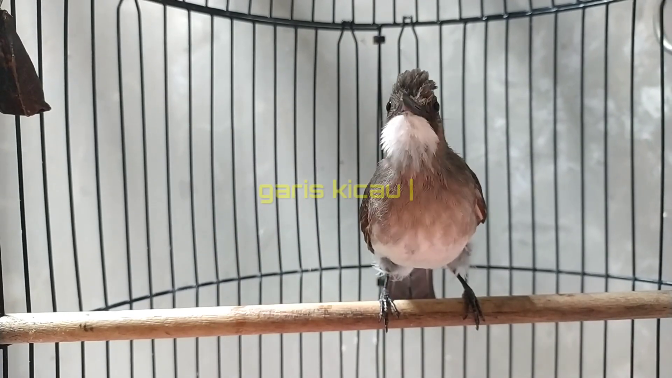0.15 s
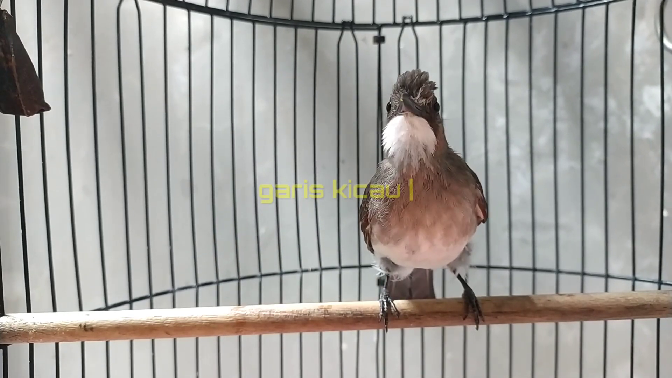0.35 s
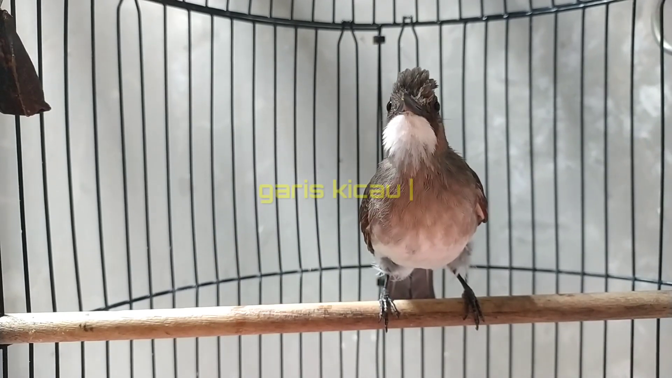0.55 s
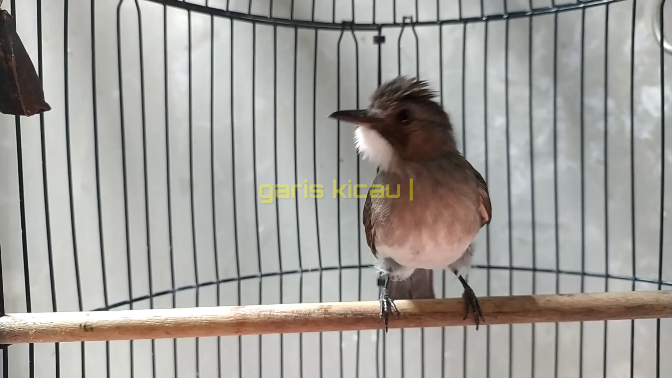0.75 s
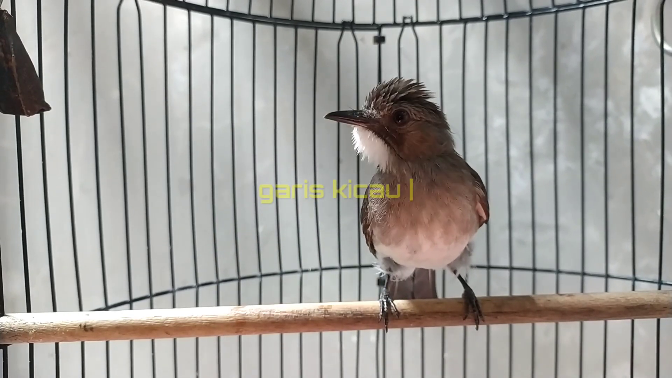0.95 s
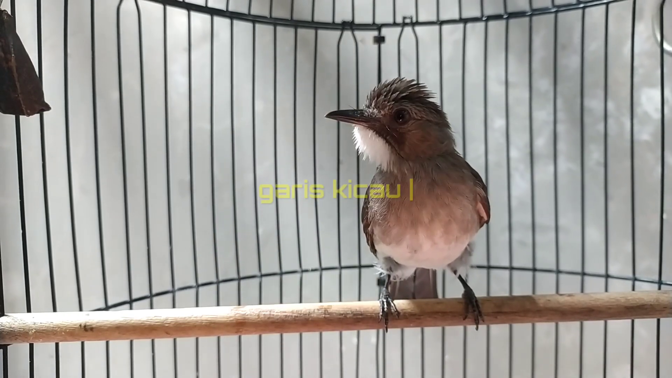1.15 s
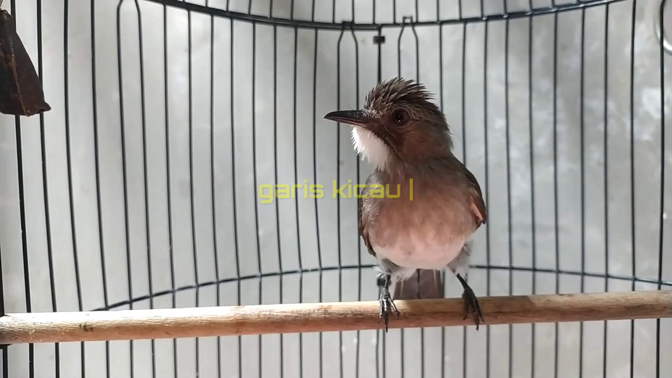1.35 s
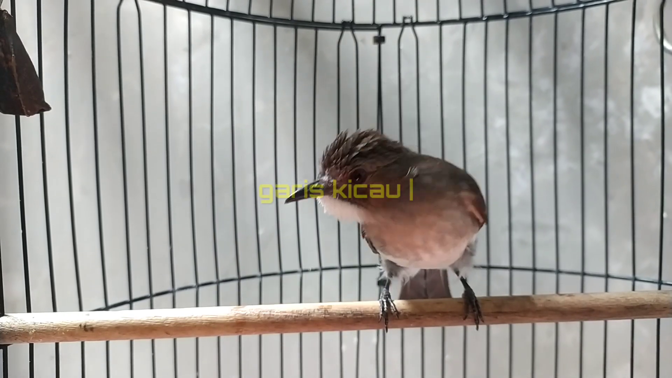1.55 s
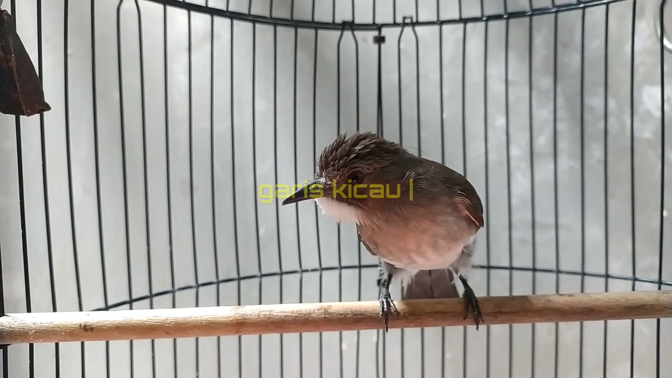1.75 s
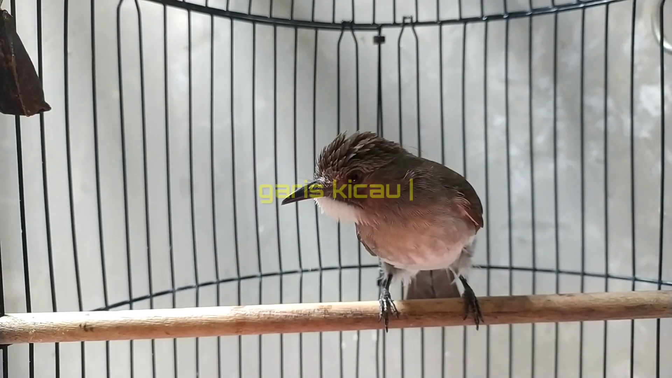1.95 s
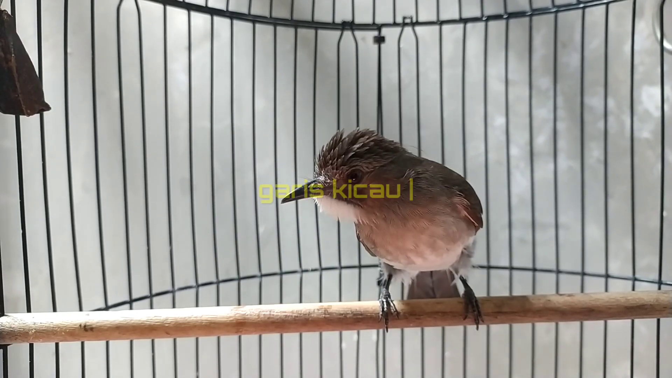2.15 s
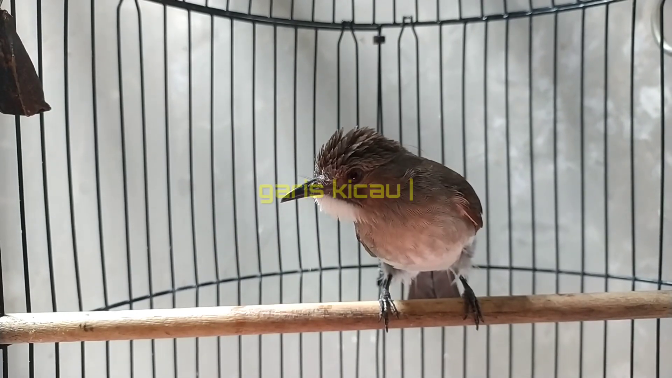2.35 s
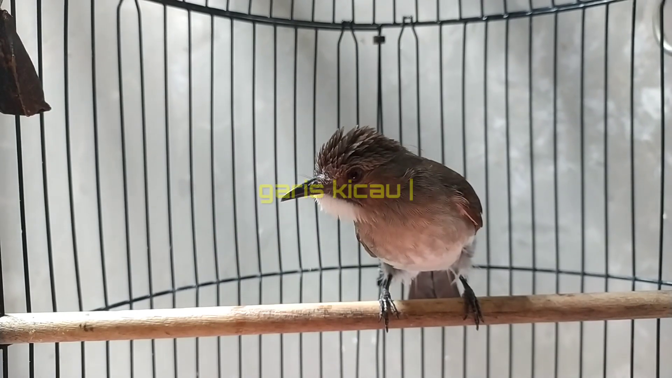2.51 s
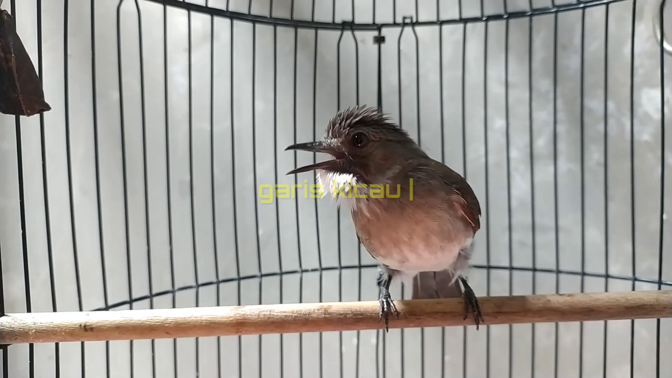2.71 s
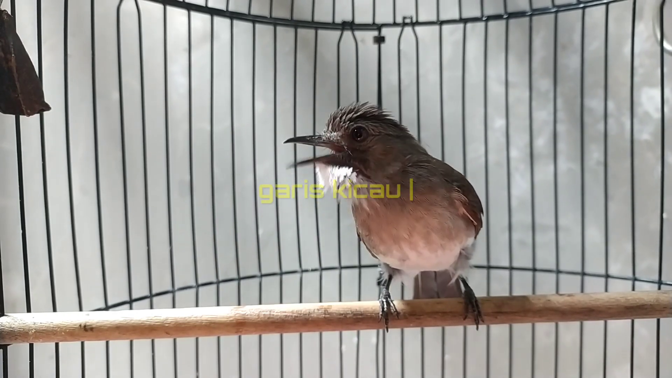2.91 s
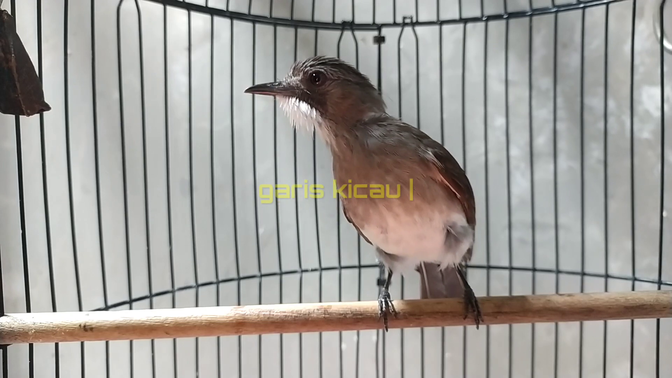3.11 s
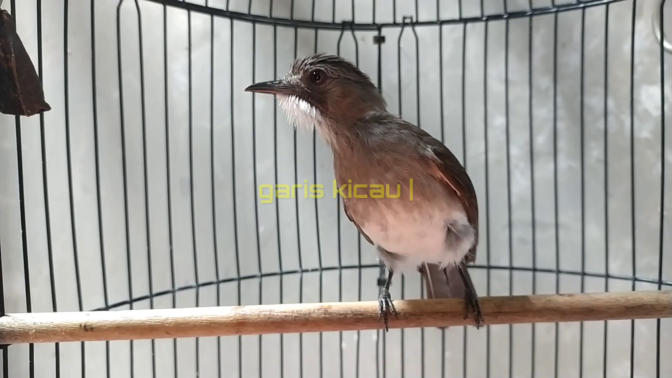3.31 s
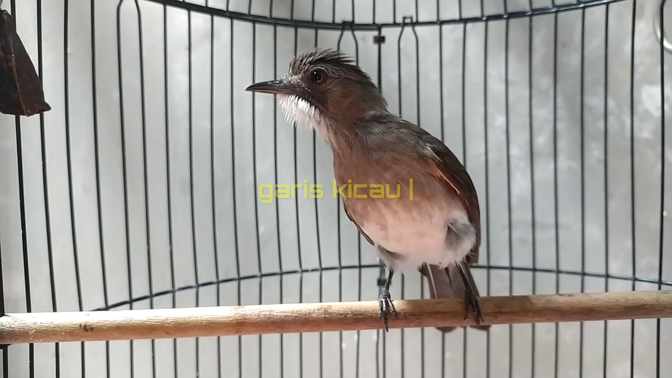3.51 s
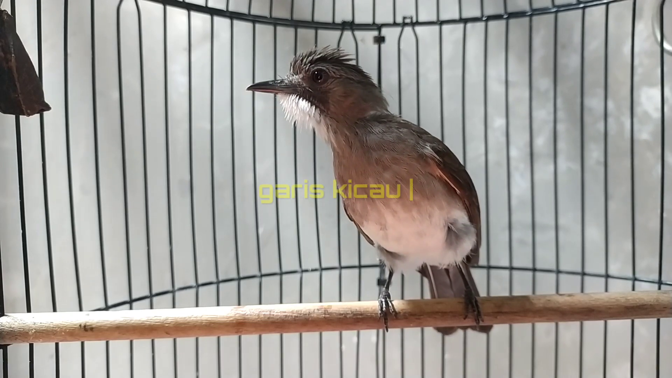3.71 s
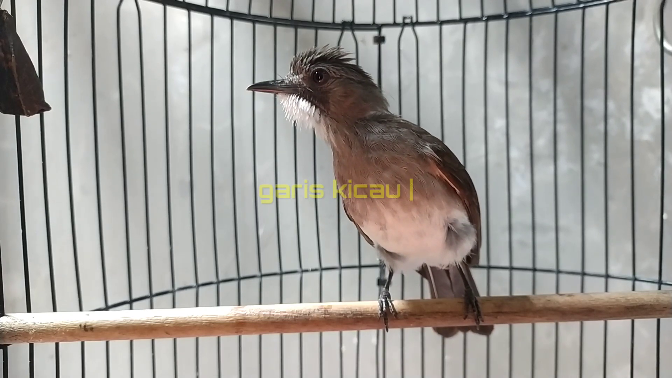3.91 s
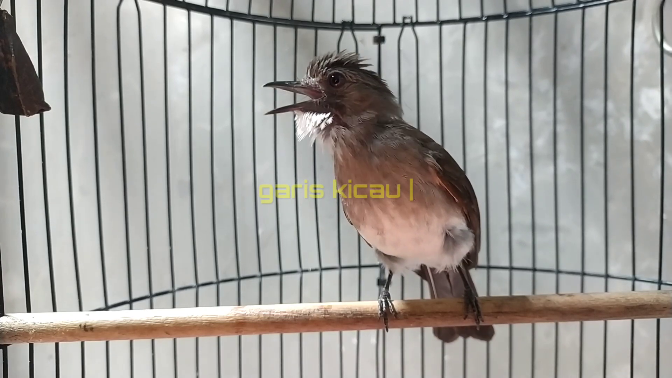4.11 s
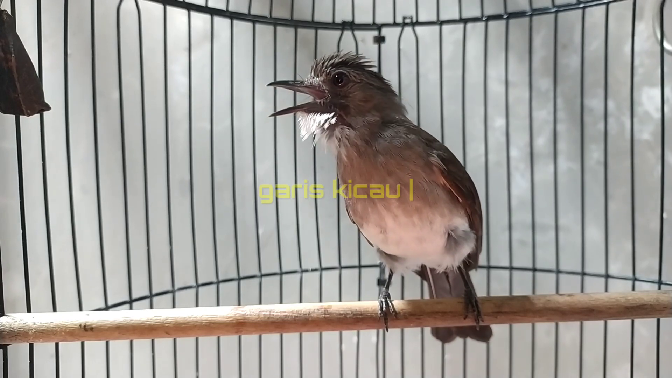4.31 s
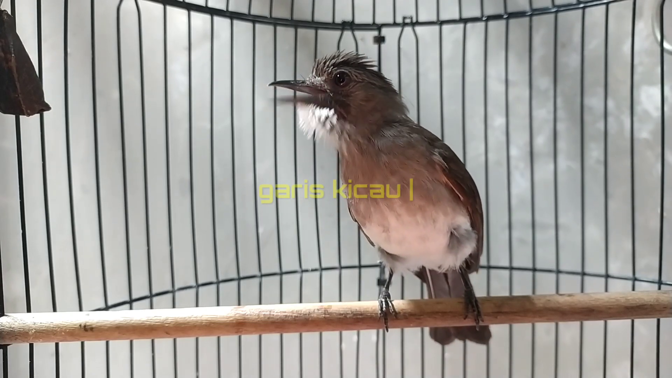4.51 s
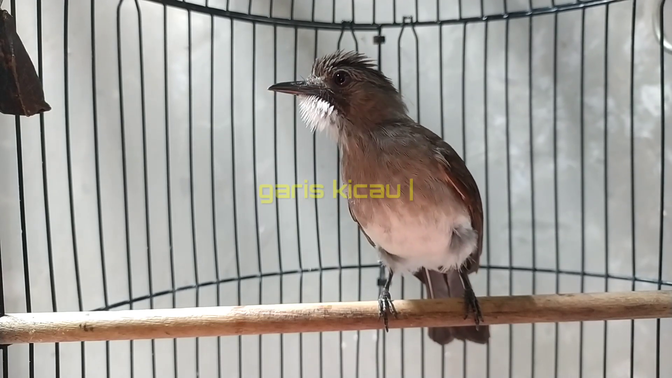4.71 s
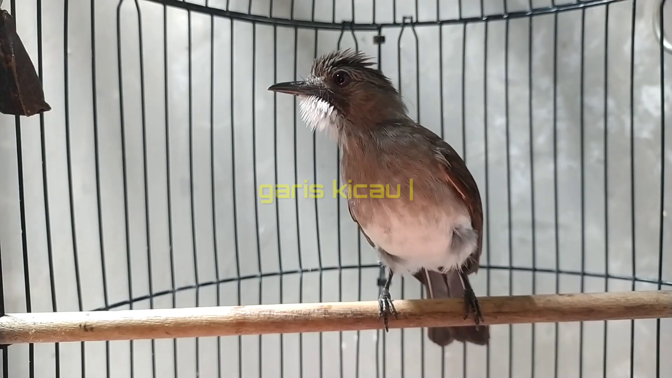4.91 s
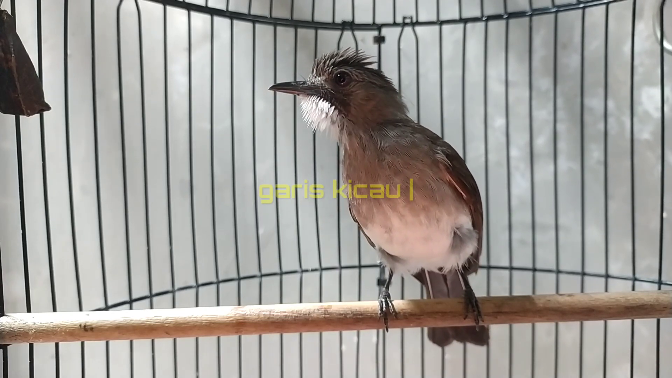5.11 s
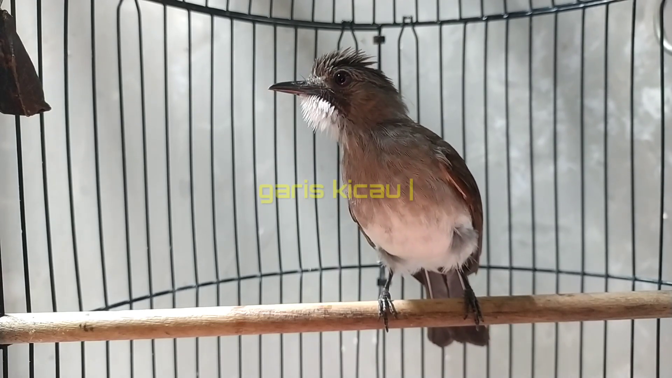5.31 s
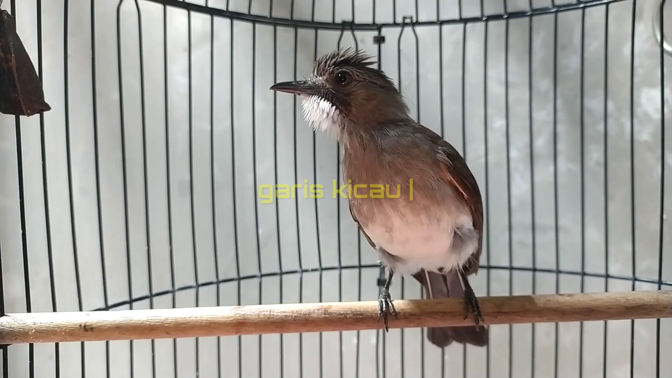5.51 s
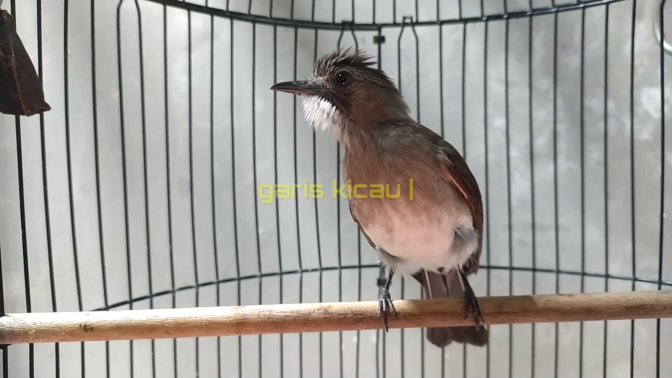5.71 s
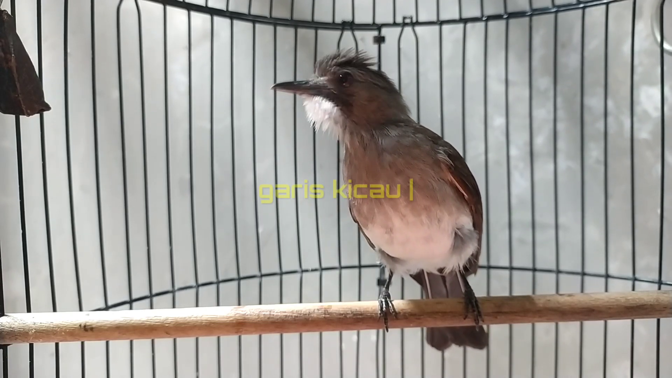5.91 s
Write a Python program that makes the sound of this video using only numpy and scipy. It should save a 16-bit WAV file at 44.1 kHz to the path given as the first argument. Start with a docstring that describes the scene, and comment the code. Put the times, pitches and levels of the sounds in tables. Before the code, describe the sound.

In a hard, bare room, a caged bird close to a stereo microphone opens with a short bright whistle. A small bird across the room twitters rapidly in high rising slurs and chips, mostly echo. After a quiet gap the close bird gives a loud, harsh buzzing call, then a longer, softer one. Another similar bird answers dully from far off. Soft hiss and rumble lie underneath.

```python
"""First one clear whistle, then two buzzing calls: a caged bulbul close to a stereo microphone in a hard, bare room.
A smaller bird twitters across the room and another bulbul answers from far off, both mostly as echo.
A quiet hiss and rumble lies under it all, and a faint low hum swells once.
Birds and hum are harmonics of a gliding pitch, weighted by a throat; the room is decaying noise, the air shaped noise.
"""
import sys
import numpy as np
from scipy import signal
from scipy.fft import rfft, irfft, next_fast_len
from scipy.io import wavfile
from scipy.ndimage import uniform_filter1d

SR = 44100
rng = np.random.default_rng(int(sys.argv[2]) if len(sys.argv) > 2 else 0)


def int16_out(signal):
    """Quantize to a 16-bit WAV file."""
    q = np.round(np.clip(np.atleast_2d(signal).T, -1, 1) * 32767)
    wavfile.write(sys.argv[1], SR, q.astype(np.int16))


N = 262395

# Room air, spectral shape before its level is set: f/Hz, relative density/dB per Hz
AIR_SPECTRUM = [(12, -33.5), (20, 1.5), (76, -8), (289, -12.5), (333, -9.5), (382, -12.5), (427, -15),
                (1160, -14.5), (1270, -13.5), (1870, -16.5), (3640, -20.5), (3960, -21), (4810, -35),
                (9660, -25), (15500, -57)]
# Room air, level of the two ports averaged: t/s, level/dB
AIR_LEVEL = [(0, -57.5), (2.001, -58.5), (4.001, -60), (5.95, -60)]
# Room air, likeness of left and right: f/Hz, correlation/0-1
AIR_LIKENESS = [(30, 0.17), (150, 0.5), (600, .6), (1500, 0), (3000, 0)]
# Echoes by band: top of band f/Hz, t60/s, relative level/dB
ROOM_BANDS = [(1300, 0.23, 10.5), (2130, 0.43, 3), (3600, 0.63, -1.5), (6060, 0.58, 1.5), (10500, 0.4, 2),
              (15980, 0.49, -0.5)]

# Close bird, held part of the whistle before the throat: t/s, pitch f/Hz, level/dB
WHISTLE_HELD = [(.063, 1004, -19), (.079, 1046, -21.5), (.11, 1050, -23.5), (.16, 1021, -18),
                (.183, 1003, -21.5), (.197, 932, -24)]
# Throat and beak in the whistle: f/Hz, gain/dB
WHISTLE_THROAT = [(900, -30.5), (2000, -11.5), (3100, 4), (3700, -8.5), (4150, -14.5), (5200, -22),
                  (6300, -33), (7300, -25.5), (8300, -17), (9400, -27.5), (10400, -26.5), (11400, -45),
                  (12500, -32), (15000, -54)]

# Small bird across the room, rising slurs:
# start t/s, length/s, from f/Hz, to f/Hz, opening level/dB, swell/dB
TWITTER_SLURS = [(0.496, 0.039, 4300, 4814, -46.5, 4), (0.682, .09, 4467, 5440, -36.5, -5.5),
                 (0.908, 0.092, 4427, 5567, -37, -3.5), (1.134, 0.095, 4430, 5704, -36.5, 1),
                 (1.376, 0.09, 4456, 5677, -35, 0), (1.61, 0.1, 4300, 5652, -37.5, 1)]
# Its chips between the slurs:
# start t/s, low f/Hz, wait on the low note/s, peak f/Hz, low-note level/dB, peak level/dB
TWITTER_CHIPS = [(.595, 3840, 0.018, 4495, -55, -48.5), (.818, 3740, .004, 4910, -47, -36),
                 (1.038, 3920, 0.024, 5030, -44.5, -34), (1.28, 3860, .024, 4994, -47, -34.5),
                 (1.52, 3818, 0.022, 5084, -46, -33.5)]
# Its throat: f/Hz, gain/dB
TWITTER_THROAT = [(3500, 5.5), (6000, 1.5), (7800, -10.5), (9600, 0), (11500, -10), (14000, -30.5),
                  (16000, -19)]

# Far bird's answers: start t/s, length/s, top pitch f/Hz, top level/dB, lift of the lower partials/dB
FAR_ANSWERS = [(0.942, 0.304, 900, -52.5, 2), (1.402, 0.095, 860, -46, 7), (1.657, 0.15, 915, -43.5, -2.5),
               (2.132, 0.27, 917, -51.5, -0.5), (3.378, 0.27, 903.5, -56.5, 7),
               (4.868, 0.133, 939, -52, -1), (5.088, 0.27, 930, -50.5, -5.5), (5.463, 0.2, 941, -50, 0.5)]
# Its throat: f/Hz, gain/dB
ANSWER_THROAT = [(900, -55), (1850, -21), (2750, -12), (3650, 4.5), (4300, -74)]

# Low hum that swells once: t/s, f/Hz, level/dB
HUM_PATH = [(2.5, 97.8, -81), (3.1, 100.8, -70.5), (3.5, 99.55, -68), (4.0, 101.6, -71.5), (4.8, 101, -89)]

# Close bird, held part of each buzzing call before the throat: t/s, pitch f/Hz, level/dB
BUZZ_CALLS = [
    [(2.785, 878.4, -8), (2.855, 870.6, -6.5), (2.935, 842.8, -7.5), (2.995, 838, -10.5), (3.026, 805, -11)],
    [(4.185, 907.5, -17), (4.27, 917, -15), (4.36, 886.4, -16.5), (4.415, 876.6, -16), (4.47, 872, -18.5),
     (4.575, 927.3, -15.5), (4.62, 925.6, -19.5)],
]
# Throat and beak, a little different in each buzzing call: f/Hz, gain/dB
BUZZ_THROATS = [
    [(900, -59), (1850, -28.5), (2200, -42), (2700, -24), (3400, -8), (4300, -29.5), (5400, -35),
     (6000, -52.5), (8100, -34.5), (9500, -40.5), (10500, -47.5), (12000, -64), (13500, -52), (15000, -71)],
    [(900, -50), (1900, -21), (2250, -27), (2750, -12.5), (3650, -2.5), (4100, -19), (4500, -26.5),
     (5400, -30), (6400, -34), (8100, -26.5), (9000, -36.5), (10000, -33), (12300, -39.5), (13500, -62)],
]
# Pitch swing of each buzzing call, shares of pitch: as it opens, as it closes
BUZZ_SWINGS = [(.085, .03), (.055, .035)]

# Each close call scoops up into its pitch and drops off it; shares are of pitch
SCOOP_S, SCOOP_SHARE, SCOOP_DB = .047, .14, -4
ATTACK_S, ATTACK_DB = .018, -22
DROP_S, DROP_SHARE, DROP_DB = .022, .2, -7

SLUR_BEND = 1.8  # exponent: a slur rises fast, then levels off
# A chip creeps up on its low note, jumps to its peak, then sags; creep and sag are shares of pitch
CHIP_CREEP, CHIP_JUMP_S = 0.0525, 0.01277
CHIP_FALL_S, CHIP_SAG, CHIP_FADE_DB = 0.0198, 0.0484, -9

BUZZ_HZ = 144  # mean rate of the buzz
BUZZ_DB, BUZZ_TURN = 3.5, 0.9  # loudness swing each way, and its lead on the pitch swing in radians
TOP_HZ = 15500  # the recorder's upper limit


def undb(db):
    """Gain of a level in dB."""
    return 10 ** (np.asarray(db) / 20)


def on_log(hz, table):
    """A (Hz, value) table read on a log-frequency axis."""
    f, v = np.transpose(table)
    return np.interp(np.log(np.maximum(hz, 1)), np.log(f), v)


def walk(rate, size):
    """Random levels held 1 / rate s and slewed twice; spread near 1."""
    hold = max(int(SR / rate), 2)
    steps = np.repeat(rng.standard_normal(size // hold + 1), hold)
    slewed = uniform_filter1d(uniform_filter1d(steps, hold), hold)
    return 1.3 * slewed[:size]


def add(track, rows, throat, count, buzz_db=0., buzz_turn=0., jitter=.002, edge_s=0.006,
        dull=0., croak=0., settle_s=.01, shimmer_db=0.):
    """Sings one note into track: harmonics of a gliding pitch, each weighted by the throat where it falls."""
    s, hz, db, *swing = np.transpose(rows)
    start, stop = int(s[0] * SR), int(s[-1] * SR)
    t = np.arange(start, stop) / SR
    smooth = int(0.00511 * SR)
    hz, db = (uniform_filter1d(np.interp(t, s, c), smooth, mode="nearest") for c in (hz, db))

    # the second voice swings pitch and loudness once per buzz cycle, at a slightly wavering rate
    buzz_rate = BUZZ_HZ * (1 + .008 * walk(40, size=len(t)))
    buzz = 2 * np.pi * np.cumsum(buzz_rate) / SR
    # the pitch is ragged until the membranes settle
    raggedness = jitter + croak * np.exp(-(t - s[0]) / settle_s)
    hz = hz * (1 + raggedness * walk(900, size=len(t)))
    if swing:
        hz = hz * (1 + np.interp(t, s, swing[0]) * np.sin(buzz))
    phase = 2 * np.pi * np.cumsum(hz) / SR

    note = np.zeros(len(t))
    for k in range(1, count + 1):
        # less effort thins the upper harmonics first
        weight = undb(on_log(k * hz, throat) + dull * k * (db - db.max()))
        below_limit = k * hz < .45 * SR
        note += weight * below_limit * np.sin(k * phase + k * k)
    edge = np.clip(np.minimum(t - s[0], s[-1] - t) / edge_s, 0, 1)
    level = db + buzz_db * np.sin(buzz + buzz_turn) + shimmer_db * walk(201.9, size=len(t))
    track[start:stop] += np.sqrt(2) * note * edge * undb(level)


def heard(voice, lag_s, pan_db, wet_db, direct_db=0.):
    """The voice at both microphone ports: direct with a lag and level offset, plus dense decaying echoes."""
    t = np.arange(SR) / SR
    f = np.fft.rfftfreq(SR, 1 / SR)
    noise = rfft(rng.standard_normal((2, SR)))
    echoes, low = 0, 0
    for top, t60, db in ROOM_BANDS:
        band = irfft(noise * ((f >= low) & (f < top)), SR)
        echoes = echoes + undb(db - 60 * t / t60) * band
        low = top
    onset = np.clip((t - .003) / 0.00067, 0, 1)
    echoes *= onset * undb(wet_db) / np.sqrt(SR * 0.038)

    size = next_fast_len(N + SR)
    f = np.fft.rfftfreq(size, 1 / SR)
    side = np.array([[.5], [-.5]])  # left, right: a positive lag delays the left, a positive pan lifts it
    delay_s = side * lag_s + 0.001006
    straight = undb(direct_db + side * pan_db) * np.exp(-2j * np.pi * f * delay_s)
    return irfft(rfft(voice, size) * (straight + rfft(echoes, size)), size)[:, :N]


def framed(held, drop_s=DROP_S):
    """The held part of a call with its scoop in front and its drop behind."""
    (s0, hz0, db0), (s1, hz1, db1) = held[0], held[-1]
    left = np.array([1, 1 - ATTACK_S / SCOOP_S, .3])  # share of the scoop still to go
    scoop_hz = hz0 * (1 - SCOOP_SHARE * left ** 2)
    scoop_db = db0 + SCOOP_DB * left + [ATTACK_DB, 0, 0]
    scoop = np.transpose([s0 - SCOOP_S * left, scoop_hz, scoop_db])
    gone = np.array([.5, 1])  # share of the drop done
    drop_hz = hz1 * (1 - DROP_SHARE * gone ** 2)
    drop = np.transpose([s1 + drop_s * gone, drop_hz, db1 + DROP_DB * gone])
    return np.vstack([scoop, held, drop])


def air():
    """Hiss and rumble: shaped noise, partly alike at both ports in the bass and separate in the treble."""
    f = np.fft.rfftfreq(N, 1 / SR)
    alike = np.clip(on_log(f, AIR_LIKENESS), 0, 1)
    mid, side = rfft(rng.standard_normal((2, N)))
    both = np.sqrt(1 + alike) * mid + np.sqrt(1 - alike) * side * np.array([[1], [-1]])
    noise = irfft(both * undb(on_log(f, AIR_SPECTRUM)), N)
    level = undb(np.interp(np.arange(N) / SR, *np.transpose(AIR_LEVEL)))
    return noise * level / np.sqrt(np.mean(noise.mean(axis=0) ** 2))


def whistle():
    """Close: one clean arched note, rich in harmonics, falling away at the end."""
    voice = np.zeros(N)
    add(voice, framed(WHISTLE_HELD, drop_s=.016), WHISTLE_THROAT, count=15,
        jitter=.0008, dull=0.03, croak=.025, settle_s=0.015)
    return heard(voice, lag_s=.00007, pan_db=1.2, wet_db=-3.5)


def twitter():
    """Across the room: thin rising slurs and leaping chips of few harmonics, mostly echo."""
    voice = np.zeros(N)
    u = np.linspace(0, 1, num=9)  # progress through a slur
    notes = []
    for s, length, lo, hi, db, swell_db in TWITTER_SLURS:
        slur_hz = hi - (hi - lo) * (1 - u) ** SLUR_BEND
        notes.append(np.transpose([s + length * u, slur_hz, db + swell_db * u]))
    for s, lo, wait, hi, low_db, db in TWITTER_CHIPS:
        top = s + wait + CHIP_JUMP_S
        notes.append([
            (s, lo, low_db),
            (s + wait, lo * (1 + CHIP_CREEP), low_db),
            (top, hi, db),
            (top + CHIP_FALL_S, hi * (1 - CHIP_SAG), db + CHIP_FADE_DB),
        ])
    for rows in notes:
        add(voice, rows, TWITTER_THROAT, count=3, jitter=0.00033, shimmer_db=2.5)
    return heard(voice, lag_s=-.00005, pan_db=-3., wet_db=3.5, direct_db=-2.)


def answers():
    """Far off, from another room: buzzing calls as nearly level-pitched swells, dull and mostly echo."""
    voice = np.zeros(N)
    for s, length, hz, db, lift_db in FAR_ANSWERS:
        times = s + length * np.array([0, .4, 1])
        arch = hz * np.array([.975, 1, .99])
        swell = db - np.array([11., 0, 5.])
        rows = np.transpose([times, arch, swell, np.full(3, .04)])  # last: pitch swing, share of pitch
        throat = [(f, g + lift_db * (f < 3 * hz + BUZZ_HZ)) for f, g in ANSWER_THROAT]
        add(voice, rows, throat, count=4, buzz_db=4.5, buzz_turn=.6, jitter=.007, edge_s=.06, shimmer_db=2.5)
    return heard(voice, lag_s=0., pan_db=0., wet_db=1.5, direct_db=-9.)


def hum():
    """A faint low tone, one sine of unsteady pitch, the same at both ports."""
    tone = np.zeros(N)
    add(tone, HUM_PATH, [(50, 0), (200, 0)], count=1, jitter=0.023)  # flat throat
    return tone


def buzzes():
    """Close: harsh calls, every harmonic split into a comb of lines one buzz rate apart."""
    voice = np.zeros(N)
    for held, swing, throat in zip(BUZZ_CALLS, BUZZ_SWINGS, BUZZ_THROATS):
        rows = framed(held)
        times = rows[:, 0]
        rows = np.column_stack([rows, np.interp(times, times[[0, -1]], swing)])
        add(voice, rows, throat, count=17, buzz_db=BUZZ_DB, buzz_turn=BUZZ_TURN,
            jitter=.001, croak=.05, settle_s=.012, shimmer_db=1.)
    return heard(voice, lag_s=.00012, pan_db=-3.15, wet_db=-3.5)


def scene():
    """Three birds, the room's air and a hum."""
    return air() + whistle() + twitter() + answers() + hum() + buzzes()


def record(dry):
    """The recorder cuts the top with a steep elliptic low-pass."""
    low_pass = signal.ellip(10, .2, 70, TOP_HZ, fs=SR, output="sos")
    return signal.sosfilt(low_pass, dry)


dry = scene()
out = record(dry)
int16_out(out)
```